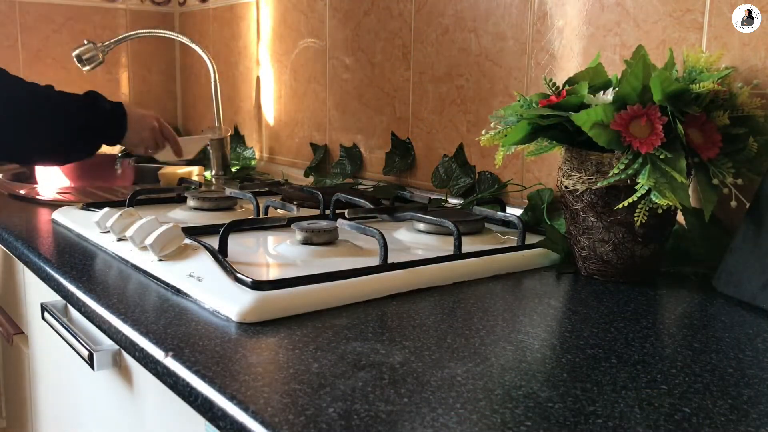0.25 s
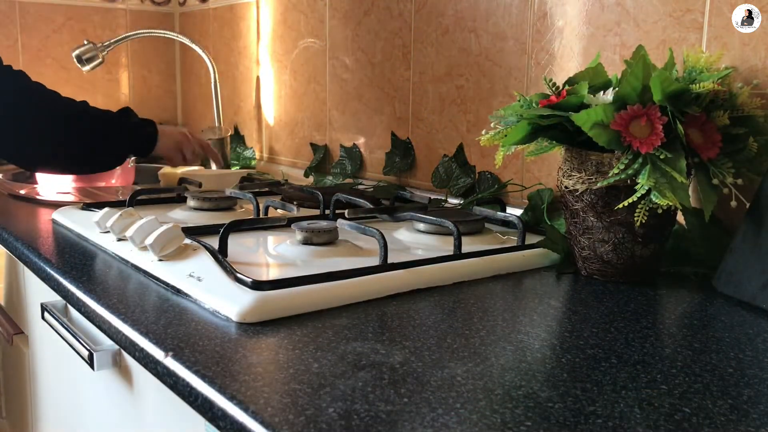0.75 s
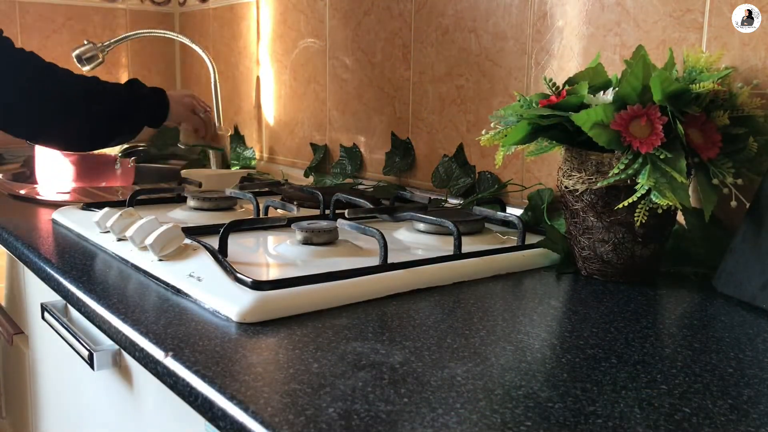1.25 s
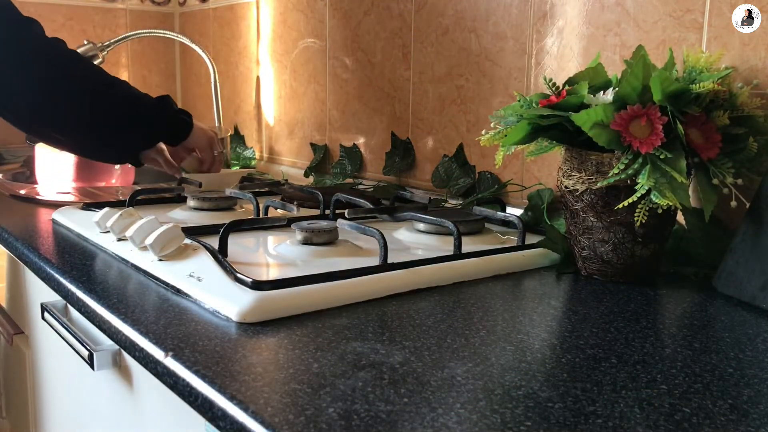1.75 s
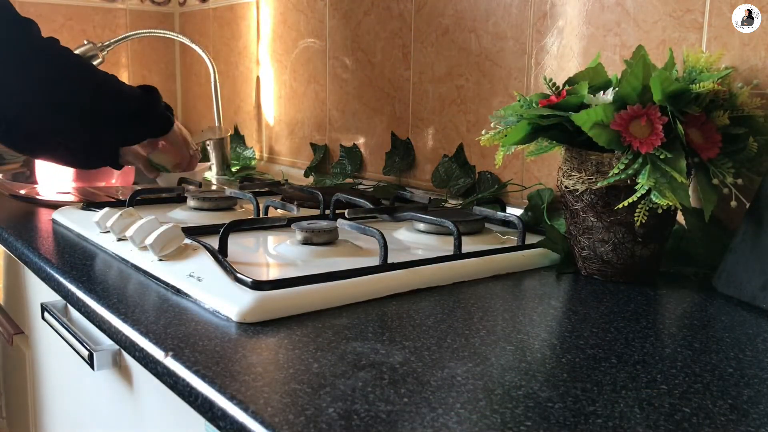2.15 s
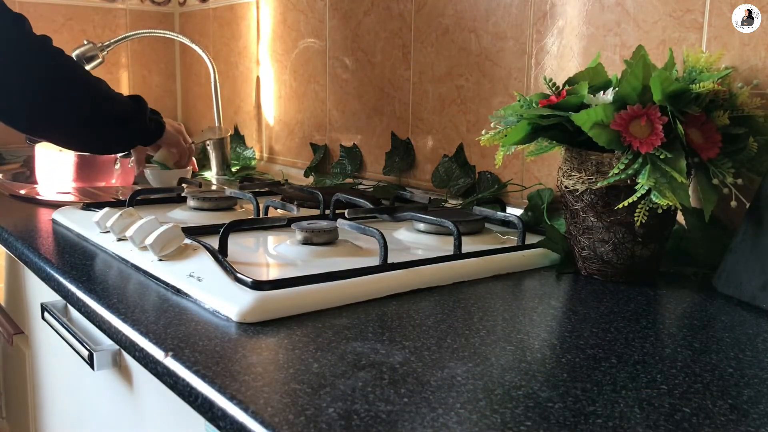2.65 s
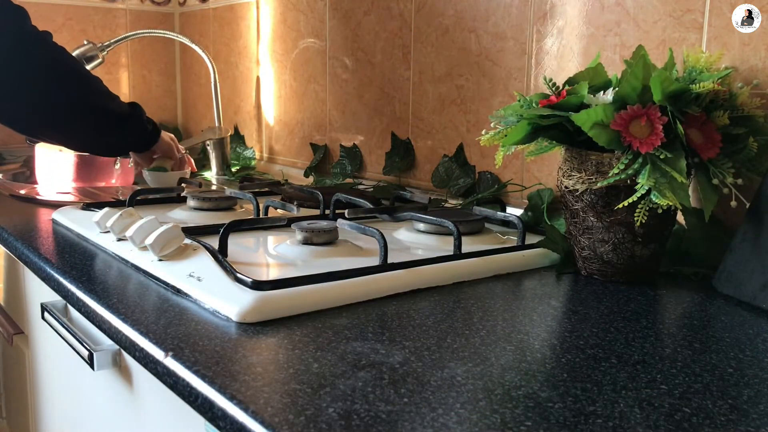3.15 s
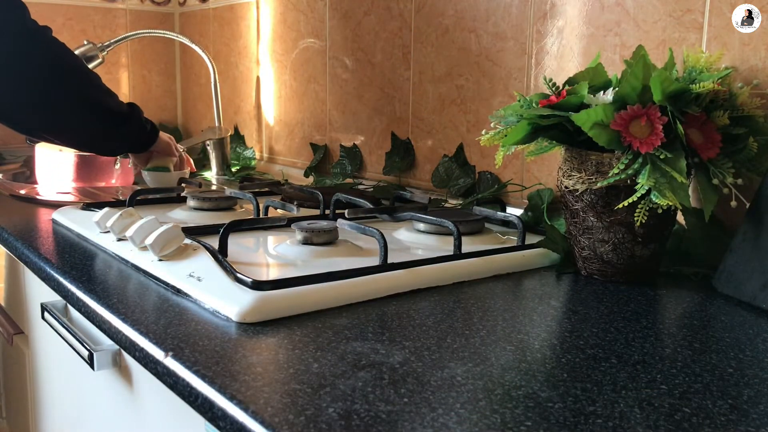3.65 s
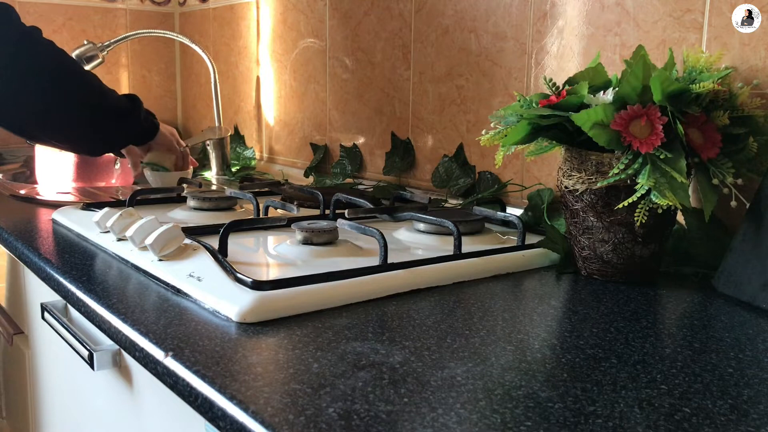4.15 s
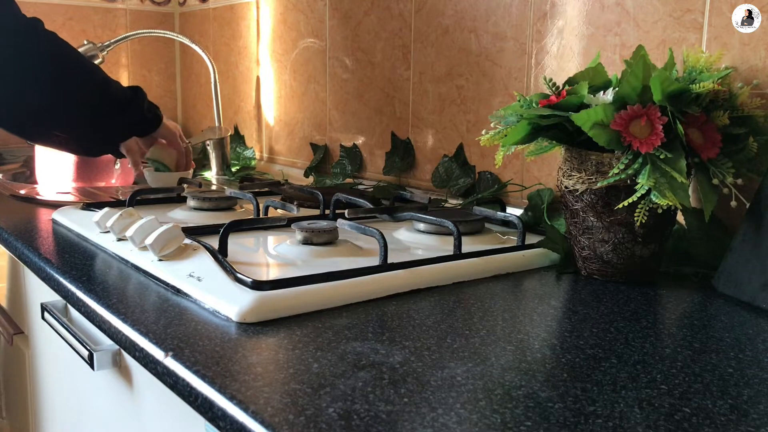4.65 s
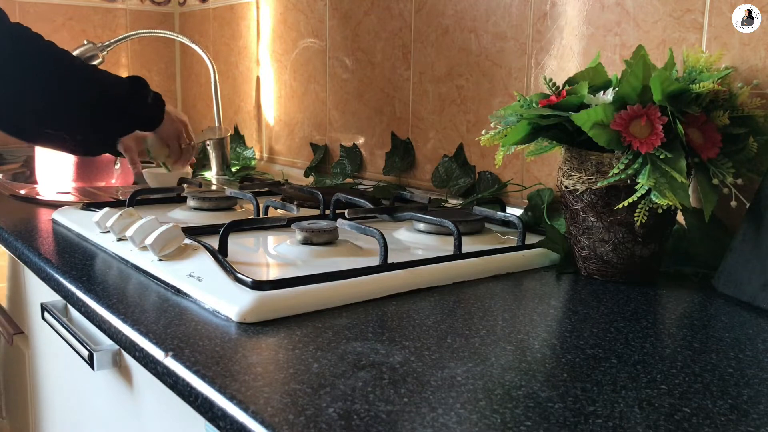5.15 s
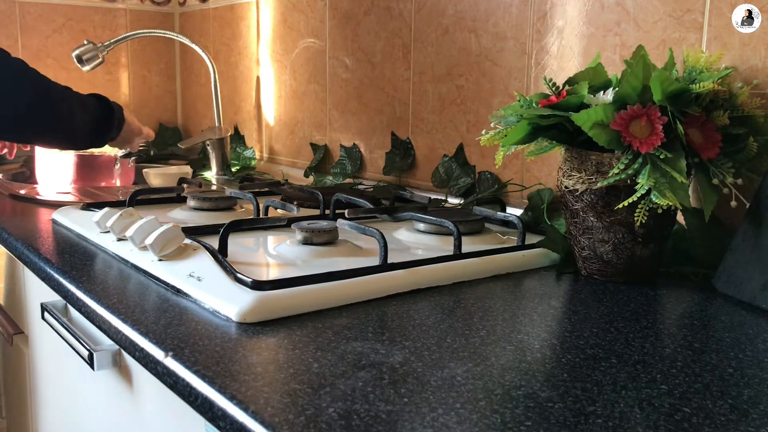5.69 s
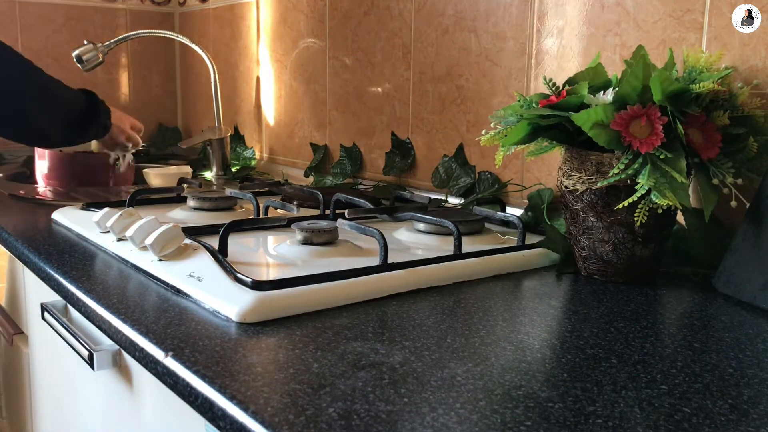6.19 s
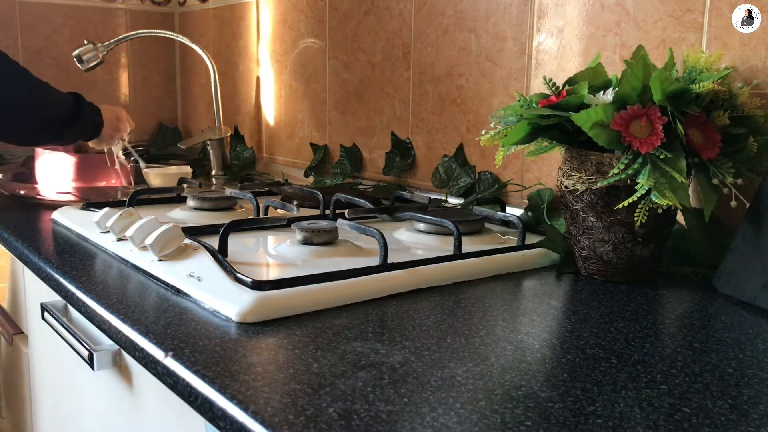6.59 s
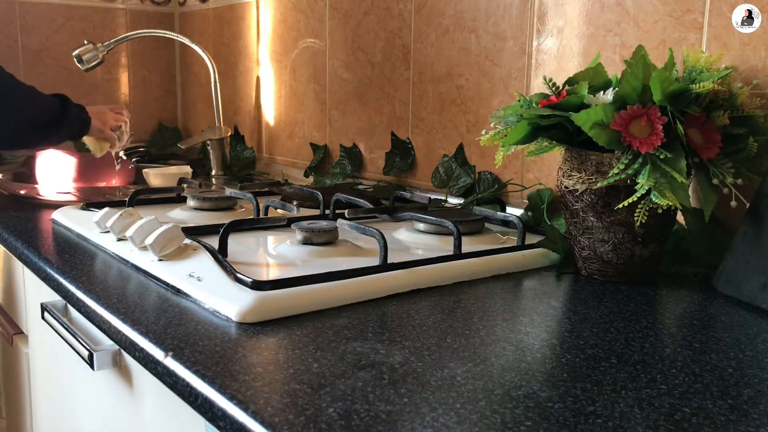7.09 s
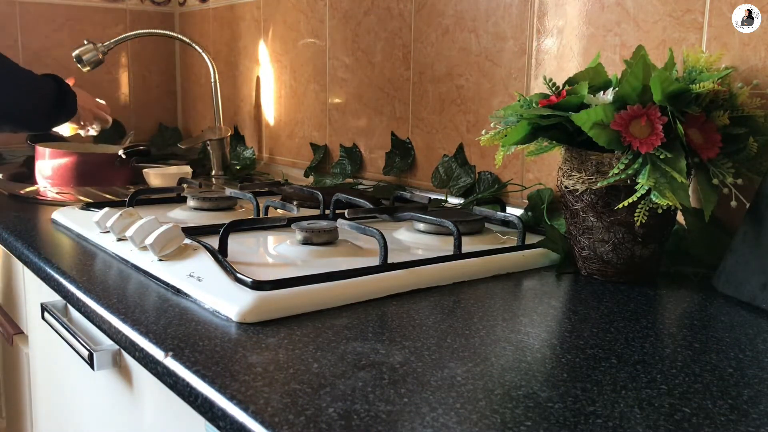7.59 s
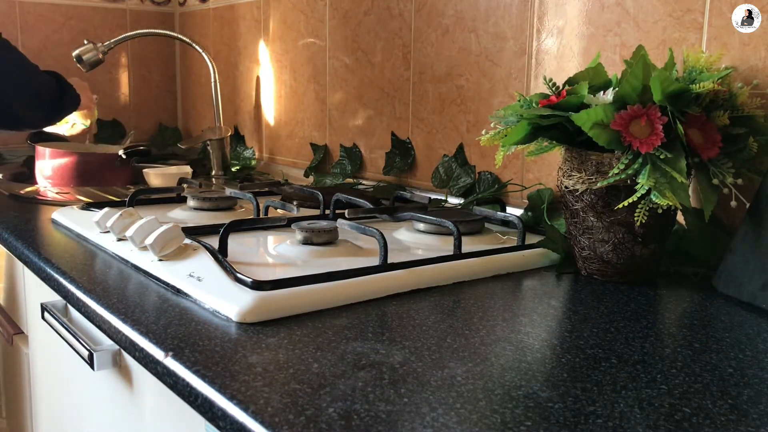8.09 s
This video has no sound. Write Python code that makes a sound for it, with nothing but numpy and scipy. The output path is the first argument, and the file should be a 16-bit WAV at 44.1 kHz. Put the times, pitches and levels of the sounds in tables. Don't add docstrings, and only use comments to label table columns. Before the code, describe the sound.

Quiet small tiled kitchen with a low building rumble, heard by a phone nearby. A hard crockery knock booms through the hollow worktop almost at once, followed by several lighter knocks. Hands and sleeves rub softly with faint wet squeaks and ticks. Near the end a thin steel lid clinks on a pot rim, then clanks home loudly with a short bright ring, and soft rustling remains.

```python
import sys
import numpy as np
from scipy import signal
from scipy.fft import rfft, irfft
from scipy.io import wavfile
from scipy.ndimage import uniform_filter1d

SR = 44100
rng = np.random.default_rng(int(sys.argv[2]) if len(sys.argv) > 2 else 0)


def convert_level_to_amplitude(level_db):
    exponent = np.asarray(level_db, float) / 20
    return 10 ** exponent


def generate_wav(sig):
    pcm = np.round(np.clip(np.atleast_2d(sig).T, -1, 1) * 32767).astype(np.int16)
    wavfile.write(sys.argv[1], SR, pcm)


N = 367353

# f/Hz, level/dB per Hz
HOUSE_COLOUR = [(12, -49.5), (24, -40), (62, 4.5), (96, -1), (225, -11), (401, -17), (526, -25),
                (857, -23.5), (1030, -36), (1500, -41), (1950, -78.5), (3300, -120)]
# f/Hz, level/dB per Hz
HISS_COLOUR = [(300, 4.5), (1000, 0), (3000, -3.5), (8000, -6), (12000, -5), (16000, -2)]
# t/s, rumble level/dB
LEAN = [(0, -52.5), (.35, -58), (.6, -60), (1.1, -54.5), (1.45, -66), (1.95, -56.5), (2.6, -65), (3.2, -75),
        (3.75, -62.5), (4.3, -59), (4.7, -53), (5.2, -61), (5.75, -50.5), (6.3, -58), (7.0, -55.5),
        (7.6, -77.5), (8.0, -49), (8.33, -71.5)]
# t/s of full speed, length/s, rub level/dB, cloth swish level/dB
STROKES = [(1.048, 0.17, -68, -76), (1.265, 0.15, -77, -73), (1.493, 0.097, -58.5, -68.5),
           (1.86, 0.26, -60.5, -70), (2.078, 0.32, -61, -77), (2.49, 0.16, -68, -75),
           (2.762, 0.28, -69.5, -80), (3.043, 0.31, -65, -75.5), (3.275, 0.34, -74, -78),
           (3.43, 0.12, -68.5, -79), (3.665, 0.21, -64, -73.5), (3.9, 0.3, -72.5, -84),
           (4.339, 0.44, -66.5, -77.5), (4.645, 0.2, -65.5, -74), (4.893, 0.26, -65.5, -76.5),
           (4.935, 0.058, -76, -82), (5.134, 0.11, -65.5, -79), (5.329, 0.094, -67, -72),
           (5.463, 0.13, -70, -72.5), (5.656, 0.57, -66, -72), (5.92, 0.11, -59, -67.5),
           (6.061, 0.22, -60, -66.5), (6.195, 0.087, -58, -64), (6.297, 0.14, -57.5, -65.5),
           (6.476, 0.29, -63, -70.5), (6.582, 0.088, -54, -68), (7.59, 0.39, -65, -73),
           (7.758, 0.12, -67, -75), (7.923, 0.13, -57, -66.5), (8.003, 0.1, -57, -71),
           (8.174, 0.18, -59, -67), (8.294, 0.091, -58.5, -62.5)]
# f/Hz, level/dB per Hz
RUB_COLOUR = [(180, -23), (300, -9.5), (349, -8), (605, -10.5), (1200, -3.5), (1360, -8.5), (3300, -5.5),
              (8000, -15), (10400, -50), (17600, -120)]
# t/s, level/dB, f/Hz, contact/s
TICKS = [
    (0.054, -71, 834, 0.012),
    (0.113, -52.5, 10100, 0.0078),
    (5.719, -55, 8700, 0.013),
    (5.738, -46.5, 10000, 0.0083),
    (5.831, -57, 5600, 0.02),
    (6.006, -52.5, 3160, 0.014),
    (6.05, -50.5, 925, 0.0073),
    (6.209, -66, 1680, 0.015),
    (7.624, -60, 2450, 0.0089),
    (8.146, -54.5, 1240, 0.011),
]
# t/s, edge level/dB, crack level/dB, sizzle level/dB, base level/dB
KNOCKS = [
    (0.6433, -25, -22.5, -30.5, -22.5),
    (1.499, -31, -38, -43, -36),
    (2.099, -43.5, -49, -58.5, -39.5),
    (2.274, -35.5, -41, -49, -45),
    (2.828, -44, -55.5, -59.5, -68),
    (3.477, -45.5, -57, -74, -64),
    (4.074, -38, -48.5, -58.5, -50),
]
# t/s, body level/dB, low body level/dB, crack level/dB
NUDGES = [(1.091, -80, -81, -64), (2.194, -48, -61, -72), (3.652, -60, -65, -62.5),
          (3.693, -63.5, -64, -71), (4.045, -59, -57, -68), (4.107, -41, -42, -51), (4.064, -49, -58, -60),
          (4.18, -72, -63, -75), (4.315, -57.5, -62.5, -61), (4.614, -60.5, -76, -67),
          (4.72, -53, -64, -83), (7.908, -52, -62, -70), (7.953, -51, -58.5, -71), (7.997, -49.5, -70, -61)]
# f/Hz, level/dB, time to fall 60 dB/s
WORKTOP_MODES = [(250, -8, 0.35), (350, 4, 0.16), (397, -1, 0.24), (500, -8, 1.1), (582, -29, 0.45),
                 (691, -2.5, 0.81), (834, -51, 0.22)]
# t/s, level/dB, f/Hz, time to fall 60 dB/s
THUDS = [(0.648, -17.5, 117, 0.32), (0.65, -32, 129, 0.6), (1.031, -48.5, 125.2, 0.11),
         (1.503, -34.5, 117, 0.09), (2.105, -31.5, 116, 0.096), (2.128, -29.5, 140, 0.1),
         (2.277, -37, 116, 0.11), (2.525, -40, 111, 0.17), (2.554, -38, 83.4, 0.041),
         (2.835, -46.5, 114, 0.1), (3.068, -58, 118.5, 0.14), (3.476, -49.5, 131, 0.14),
         (3.691, -53.5, 114.5, 0.21), (4.055, -39.5, 116, 0.089), (4.112, -40.5, 136, 0.085),
         (4.692, -45, 101, 0.17), (5.448, -48, 68.5, 0.18), (6.028, -47, 71, 0.24),
         (6.775, -45.5, 75, 0.33), (7.888, -49.5, 74, 0.3), (7.944, -46, 131, 0.1)]
# t/s, level/dB, f/Hz, time to fall 60 dB/s
BOWL_NOTES = [(0.653, -31, 390, 0.032), (1.505, -40, 716, 0.09), (1.505, -45, 630, 0.04),
              (1.505, -35, 399, 0.061), (2.11, -38, 342, 0.07), (2.109, -43, 222, 0.14),
              (2.276, -35.5, 2390, 0.017), (2.28, -44, 803, 0.039), (2.285, -46, 203, 0.086),
              (2.115, -43, 1390, 0.028), (2.2, -57, 350, 0.05), (2.829, -42.5, 2480, 0.013),
              (3.478, -61, 2300, .015), (2.276, -45, 3650, 0.044), (2.833, -49, 1100, 0.013),
              (2.833, -47, 1750, 0.014), (4.076, -36, 524, 0.02), (4.125, -39.5, 610, 0.037),
              (7.625, -60, 2450, 0.02), (4.078, -41, 1450, .025), (.65, -30, 1250, 0.019),
              (3.478, -56, 1410, .03), (4.075, -45, 2290, .02), (.66, -30, 500, .04), (.712, -33, 480, .05),
              (.745, -36, 520, .05), (.648, -32, 1650, .03), (.68, -37, 1500, .03)]
# t/s, level/dB, f/Hz, time to fall 60 dB/s
LINGER_NOTES = [(.648, -40.5, 250, .45), (.648, -44, 220, .3), (.648, -35, 82, 0.4), (.648, -35, 145, .3),
                (.65, -47, 495, 0.98), (.65, -41, 509.4, 0.45), (.65, -45, 647, 0.58),
                (.65, -37.5, 1350, 0.28), (.65, -42, 1510, 0.24), (.65, -35.5, 1682, 0.31),
                (.65, -54.5, 1870, 0.32), (.65, -45.5, 2716, 0.51), (1.51, -39.5, 87, 0.41),
                (1.505, -40, 149, .2), (1.505, -48, 411, 0.3), (1.505, -42, 738, 0.43),
                (1.505, -46, 695, .38), (1.505, -49, 800, 0.32), (1.505, -43.5, 808, 0.39),
                (2.28, -52, 560, .3), (2.28, -52, 720, 0.32), (2.28, -53, 1470, 0.29),
                (2.83, -57, 337, 0.19), (2.83, -64, 710, 0.27), (2.83, -55, 1092, 0.29),
                (2.83, -60.5, 1490, 0.13), (2.83, -60, 2190, 0.11), (2.83, -64, 2700, 0.11),
                (3.476, -49.5, 350, 0.21), (3.476, -55, 1124, .2), (3.476, -56.5, 1500, 0.11),
                (3.476, -63, 2420, .15), (6.655, -40, 562, 0.12), (6.742, -48, 600, 0.4),
                (6.742, -48, 2300, .3), (6.82, -45.5, 3690, 0.2), (6.825, -43, 1015, .4),
                (7.134, -24.5, 653, 0.33), (7.134, -30, 715, 0.45), (7.134, -32.5, 571.6, 0.29),
                (7.134, -31, 1087, 0.3), (7.134, -32.5, 1123, 0.55), (7.134, -28, 1196, .56),
                (7.134, -52.5, 395, 0.42), (7.134, -42.5, 5150, .4), (7.134, -49, 2180, 0.59),
                (7.134, -52.5, 2100, .45), (7.134, -38, 3410, 0.55), (7.134, -36, 4020, .28),
                (7.134, -47.5, 2750, 0.31)]
# t/s, level/dB, f/Hz, time to fall 60 dB/s
NEIGHBOUR_NOTES = [(7.134, -32, 1066, 0.57), (7.134, -34.5, 1110, 0.49), (7.133, -37.5, 1018, .45),
                   (7.134, -36, 1238, .5), (7.134, -42, 1294, .45), (7.134, -38, 1943, .43),
                   (7.134, -41, 1858, .45), (.65, -33.5, 1150, .3), (.65, -38.5, 1230, 0.37),
                   (.65, -45, 2750, .25)]
# t/s, level/dB, f/Hz, time to fall 60 dB/s
SQUEAK_NOTES = [(4.617, -60, 2300, .04), (4.62, -67, 1320, 0.033), (4.655, -72, 2900, .03),
                (4.91, -72, 2500, .04), (4.935, -71, 2300, 0.046), (4.945, -70, 3200, 0.036),
                (5.115, -63, 1390, 0.034), (5.135, -65, 2310, 0.052), (5.46, -70, 6350, .03),
                (5.83, -68, 5430, .03), (5.85, -68, 5900, .06), (5.89, -63, 3080, 0.044)]
# t/s, low level/dB, middle level/dB, high level/dB, contact/s
CLINKS = [(6.631, -57, -62, -68, 0.012), (6.654, -36, -33, -34, 0.03), (6.686, -43, -41.5, -38, 0.00092),
          (6.741, -32, -28.5, -20.5, 0.0072), (6.764, -29.5, -51, -28.5, 0.0029),
          (6.789, -47.5, -34.5, -46, 0.0026), (6.825, -27.5, -30, -36.5, 0.0031),
          (6.844, -49.5, -50.5, -38, 0.0071), (6.869, -30.5, -39, -64, 0.0034),
          (6.899, -52, -46.5, -58, 0.0021), (6.944, -60, -60, -63.5, 0.0017),
          (6.974, -42, -45.5, -50, 0.013)]
# t/s, low level/dB, middle level/dB, high level/dB, contact/s
CLANKS = [
    (7.108, -24, -55.5, -18.5, 0.007),
    (7.116, -26, -43.5, -17, 0.0029),
    (7.131, -12, -19.5, -19, 0.003),
    (7.137, -9.5, -24, -19, 0.0056),
    (7.149, -21, -38, -34, 0.0015),
    (7.178, -14, -46, -18.5, 0.0014),
    (7.189, -25, -38, -38, 0.0063),
    (7.221, -21.5, -57, -17, 0.004),
    (7.239, -30, -32.5, -37, 0.0017),
]
# f/Hz, level/dB, time to fall 60 dB/s
RIM_MODES = [(580, -5, 0.1), (650, -8, 0.08), (730, 3, 0.031), (1040, -17, 0.19), (1082, 5.5, 0.027),
             (1182, -7, 0.053), (1720, -11.5, 0.037), (1603, -10, 0.04), (2280, -9, 0.054),
             (2420, -8.5, .04), (2592, -1.5, 0.04), (2900, -16.5, 0.084), (3200, -14, 0.05),
             (3690, 2.5, .1), (4120, 3.5, .1), (4520, -5, .1), (5320, 4.5, 0.08), (5920, 0, 0.04),
             (6640, -10.5, .1), (6530, 1.5, .1), (7500, -6.5, .08), (7300, -1.5, .08), (8800, -13, .08),
             (9500, -12.5, 0.067), (9590, -17.5, 0.073)]
# f/Hz, level/dB, time to fall 60 dB/s
LID_MODES = [(574, -22, .1), (630, -10, 0.062), (658, -2, 0.08), (695, -11, 0.069), (1063, -14, 0.065),
             (1142, -5.5, 0.18), (1087, -8, 0.1), (1196, -4, 0.13), (1299, -18.5, 0.18), (1740, -10.5, .08),
             (1853, 10.5, 0.09), (1943, 1.5, 0.098), (2180, -20, .3), (2540, -2.5, 0.1), (2930, -2, 0.039),
             (2707, 4.5, .14), (3410, -6, .18), (4010, -6, 0.1), (4580, -8.5, .06), (5150, -1.5, .1),
             (5820, -3, 0.081), (6050, -3, 0.07), (7660, -6, .08), (6550, 1, 0.06), (7090, -6, 0.069),
             (8320, 0.5, 0.09), (9920, 2.5, .08), (9400, -5, .08), (11100, -4, .08), (12100, -14, .08)]
# t/s, level/dB, f/Hz, time to fall 60 dB/s
PING_NOTES = [(6.628, -48.5, 606, .1), (6.656, -27, 1740, 0.06), (6.742, -26, 2590, 0.06),
              (6.742, -36, 1732, .04), (6.742, -28, 1800, .05), (6.822, -42, 1033, .05),
              (7.134, -33, 1100, 0.2), (7.138, -25.5, 1138, 0.06), (7.138, -23, 1200, .03),
              (7.138, -34, 1062, 0.12), (7.136, -33, 607, .1), (7.134, -26.5, 716, 0.14),
              (7.134, -33, 786, .1), (7.19, -42, 3410, .1), (6.66, -50, 410, 0.096), (6.742, -53, 370, .05),
              (6.79, -56, 320, .1), (7.134, -27, 1931, 0.11), (7.134, -24, 3220, 0.048),
              (7.222, -27.5, 6550, 0.045), (7.222, -38, 5800, .05), (7.23, -31, 4500, .05),
              (7.222, -28, 9960, .05), (7.108, -30, 6050, .04), (7.134, -31, 4020, .05),
              (6.742, -34, 3050, .04), (6.742, -34.5, 3690, .06), (6.742, -34, 4800, .05),
              (6.656, -38, 2570, .08), (6.975, -46, 2250, .04)]
# f/Hz, time to fall 60 dB/s
ROOM_DECAY = [(100, 0.43), (300, 0.42), (620, 0.29), (1100, 0.51), (2500, 0.4), (5000, 0.38), (9000, 0.3),
              (15000, 0.24)]
# f/Hz, width/Hz, level/dB
MIC_DIPS = [(4920, 460, -2.5), (7720, 830, -4), (10650, 1420, -6.5)]


def unit(x):
    return x / np.sqrt(np.mean(x ** 2))


def peak(x, db):
    return x * convert_level_to_amplitude(db) / np.sqrt(uniform_filter1d(x ** 2, size=176).max())


def on_log(table, hz):
    f, value = np.transpose(table)
    return np.interp(np.log(np.maximum(hz, 1)), np.log(f), value)


def coloured(x, table):
    hz = np.fft.rfftfreq(len(x), 1 / SR)
    return irfft(rfft(x) * convert_level_to_amplitude(on_log(table, hz)), len(x))


def band(x, lo_hz, hi_hz):
    return signal.sosfilt(signal.butter(2, [lo_hz, hi_hz], "band", fs=SR, output="sos"), x)


def fade(t, t60):
    return np.exp(-np.log(1000) * t / t60)


def walk(rate_hz):
    hold = int(SR / rate_hz)
    steps = np.repeat(rng.standard_normal(N // hold + 1), hold)
    smooth = uniform_filter1d(uniform_filter1d(steps, hold), hold)
    return unit(smooth[:N])


def add(out, s, x):
    i = int(s * SR)
    out[i:i + len(x)] += x[:len(out) - i]


def contact(length_s, grit_db=2.0):
    t = np.arange(4096) / SR
    grit = rng.standard_normal((2, len(t)))
    shape = (1 - fade(t, 0.5 * length_s)) * fade(t, 4 * np.clip(length_s, 0.001, 0.03))
    blow = grit[0] * convert_level_to_amplitude(grit_db * np.clip(grit[1], -2, 2)) * shape
    spectrum = rfft(blow)
    blow = irfft(spectrum / np.abs(spectrum)) * np.sqrt(shape)
    return np.pad(blow, (0, SR // 3 - len(t)))


def ring(blow, modes, longest_s):
    t = np.arange(len(blow)) / SR
    hz, db, t60 = (c[:, None] for c in np.transpose(modes))
    chance = rng.standard_normal((2, len(modes), 1))
    weight = convert_level_to_amplitude(db + 2.5 * chance[0]) * fade(t, np.minimum(t60, longest_s))
    swing = np.sin(2 * np.pi * hz * (1 + 0.003 * chance[1]) * t)
    response = np.sum(weight * swing, axis=0)
    return signal.fftconvolve(blow, response)[:len(t)]


def house():
    noise = rng.standard_normal((2, N))
    rumble = unit(coloured(noise[0], HOUSE_COLOUR)) * convert_level_to_amplitude(-63.5)
    hiss = unit(coloured(noise[1], HISS_COLOUR)) * convert_level_to_amplitude(-70.5)
    return rumble + hiss


def hands():
    t = np.arange(N) / SR
    s, length_s, rub_db, swish_db = (c[:, None] for c in np.transpose(STROKES))
    share = np.where(t < s, 0.27, 0.46)
    speed = np.exp(-((t - s) / (length_s * share)) ** 2)
    grain = rng.standard_normal((3, N))
    lean_db = np.interp(t, *np.transpose(LEAN))
    rumble = unit(band(grain[0], 42, 165)) * convert_level_to_amplitude(lean_db - 9.0 + 3.5 * walk(27))
    rub = unit(coloured(grain[1], RUB_COLOUR)) * np.sum(convert_level_to_amplitude(rub_db) * speed, axis=0)
    rub = rub * convert_level_to_amplitude(-5.0 + 1.6 * walk(30))
    swish = unit(band(grain[2], 7400, 13500)) * np.sum(convert_level_to_amplitude(swish_db) * speed, axis=0)
    swish = swish * convert_level_to_amplitude(-2.5 + 5.3 * walk(50))
    return rumble, rub + swish


def clock_leak():
    start_s, period_s = 0.0359, 0.10235
    times = np.arange(start_s, N / SR, period_s)
    clock = np.zeros(N)
    clock[(times * SR).astype(int)] = convert_level_to_amplitude(-45.0 + 2.2 * rng.standard_normal(len(times)))
    return band(band(clock, 8900, 17000), 11000, 17000)


def ticks():
    out = np.zeros(N)
    for s, db, hz, length_s in TICKS:
        brush = band(contact(length_s), hz / 1.25, min(hz * 1.35, 18000))
        add(out, s, peak(brush, db - 7.5))
    return out


def knocks():
    edge_contact_s, base_contact_s, nudge_contact_s = 0.011, 0.01, 0.015
    base_late_s = 0.0079
    blows = []
    for s, edge, crack, sizzle, base in KNOCKS:
        blows.append((s, edge, edge - 4.5, crack, sizzle, edge_contact_s))
        blows.append((s + base_late_s, base + 4.5, base, crack - 11, sizzle - 11, base_contact_s))
    for s, body, low, crack in NUDGES:
        blows.append((s, body, low, crack, crack - 12, nudge_contact_s))
    out = np.zeros(N)
    for s, body_db, low_db, crack_db, sizzle_db, length_s in blows:
        blow = peak(contact(length_s), 0)
        # f/Hz, level/dB, each level spread over its band
        colour = [(120, low_db - 13.0), (190, low_db + 7.0), (340, low_db + 16), (560, low_db + 14.5),
                  (1000, body_db + 7.0), (3300, crack_db + 5.5),
                  (9000, sizzle_db + 0.33), (16000, sizzle_db - 2.0)]
        add(out, s, coloured(blow, colour)[:SR // 5])
        add(out, s, peak(ring(blow, WORKTOP_MODES, 0.17), low_db - 10.0))
    return out


def thuds():
    out, t = np.zeros(N), np.arange(SR // 2) / SR
    for s, db, hz, t60 in THUDS:
        phase = 2 * np.pi * hz * (t + 0.00023 * (1 - fade(t, 0.6)))
        swing = np.sin(phase) + 0.03 * np.sin(1.83 * phase)
        add(out, s, peak((1 - fade(t, 0.052)) * fade(t, t60) * swing, db - 3.0))
    return out


def clear_notes(notes, longest_cycles):
    out, t = np.zeros(N), np.arange(SR // 2) / SR
    for s, db, hz, t60 in notes:
        envelope = (1 - fade(t, 0.0075)) * fade(t, min(t60, longest_cycles / hz))
        add(out, s, convert_level_to_amplitude(db) * envelope * np.sin(2 * np.pi * hz * t))
    return out


def linger():
    waver_db, drift_rad, longest_s = 3.5, 1.0, 0.58
    out, t = np.zeros(N), np.arange(SR // 2) / SR
    notes = list(LINGER_NOTES) + list(NEIGHBOUR_NOTES)
    knots_s = np.linspace(0, 0.5, 20)
    for s, db, hz, t60 in notes:
        chance, drift = rng.standard_normal((2, 20))
        smear = drift_rad * np.interp(t, knots_s, drift - drift[0])
        beat_db = waver_db * np.interp(t, knots_s, chance) * (1 - fade(t, 0.2))
        envelope = (1 - fade(t, 0.012)) * fade(t, min(t60, longest_s))
        add(out, s, convert_level_to_amplitude(db + beat_db) * envelope * np.sin(2 * np.pi * hz * t + smear))
    return out


def steel(blows, modes, rattle_db, top_hz):
    out, modes = np.zeros(N), np.array(modes)
    edges_hz, crowding_db = (500, 1450, 3350, top_hz), (-14, -3, 0)
    for s, *levels_db, length_s in blows:
        blow = contact(length_s)
        crowd = rng.standard_normal(len(blow)) * fade(np.arange(len(blow)) / SR, 0.046)
        for lo, hi, thick_db, db in zip(edges_hz, edges_hz[1:], crowding_db, levels_db):
            inside = (modes[:, 0] > lo) & (modes[:, 0] <= hi)
            tone = ring(blow, modes[inside], 42 / lo ** 0.89)
            rattle = band(band(crowd, lo, hi), lo, hi)
            both = peak(tone, db) + peak(rattle, db + rattle_db + thick_db)
            add(out, s, convert_level_to_amplitude(-9.5) * both)
    return signal.sosfilt(signal.butter(8, 550, "high", fs=SR, output="sos"), out)


def snap():
    snap_s, snap_hz = 7.1397, 1120
    cycles = (np.arange(N) / SR - snap_s) * snap_hz
    return -convert_level_to_amplitude(-8) * np.cos(2 * np.pi * cycles) * np.exp(-(cycles / 3) ** 2)


def room(x):
    build_s = 0.0014
    t = np.arange(SR // 4 * 3) / SR
    tail = np.zeros(len(t))
    for hz in 60 * 2 ** np.arange(0, 8.2, 0.5):
        noise = band(rng.standard_normal(len(t)), hz / 1.317, hz * 1.21)
        tail += noise * fade(t, on_log(ROOM_DECAY, hz))
    cells = signal.stft(tail, nperseg=1024, noverlap=768)[2]
    power = uniform_filter1d(np.abs(cells) ** 2, size=7, axis=1) + 1e-18
    even = cells * np.sqrt(uniform_filter1d(power, size=9, axis=0) / power)
    tail = signal.istft(even, nperseg=1024, noverlap=768)[1][:len(t)]
    tail = tail * (1 - np.exp(-t / build_s))
    return x + signal.oaconvolve(x, tail / np.sqrt(np.sum(tail ** 2)))[:N]


def scene():
    rumble, rustle = hands()
    struck = ticks() + knocks() + clear_notes(BOWL_NOTES, 38) + clear_notes(SQUEAK_NOTES, 400)
    metal = steel(CLINKS, RIM_MODES, 3, 12300) + steel(CLANKS, LID_MODES, 1, 13600)
    metal = metal + clear_notes(PING_NOTES, 500)
    sent = convert_level_to_amplitude(-1)
    worktop = room(struck + rustle * convert_level_to_amplitude(-2.5))
    pot = sent * room(metal) + (1 - sent) * metal
    direct = house() + rumble + thuds() + linger() + snap()
    return (worktop + pot + direct)[None]


def low_pass(x):
    return signal.sosfilt(signal.butter(12, 16530, fs=SR, output="sos"), x)


def record(dry):
    hz = np.fft.rfftfreq(N, 1 / SR)
    colour_db = sum(db * np.exp(-((hz - f) / width) ** 2) for f, width, db in MIC_DIPS)
    heard = irfft(rfft(dry) * convert_level_to_amplitude(colour_db), N) + clock_leak()
    heard = signal.sosfilt(signal.ellip(10, 0.2, 50, 15720, fs=SR, output="sos"), heard)
    return low_pass(heard)


dry = scene()
out = record(dry)
generate_wav(out)
```